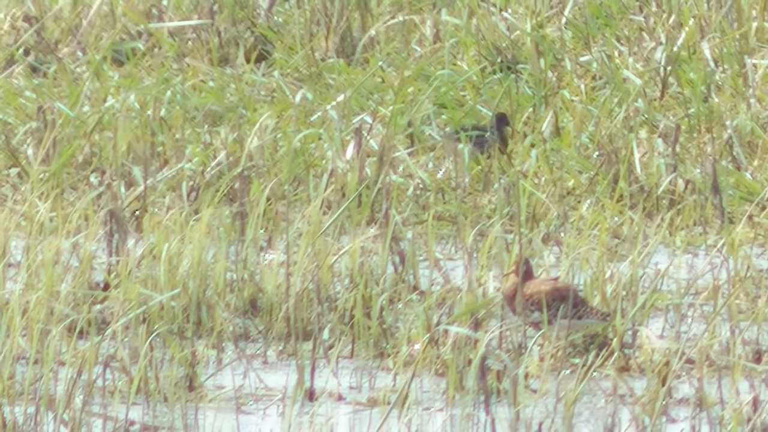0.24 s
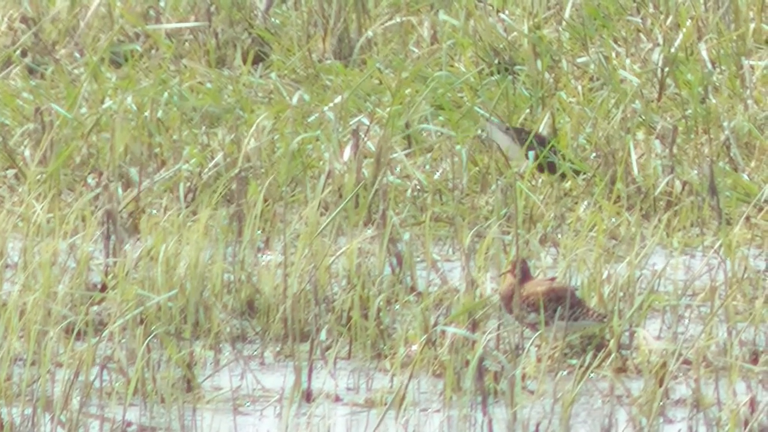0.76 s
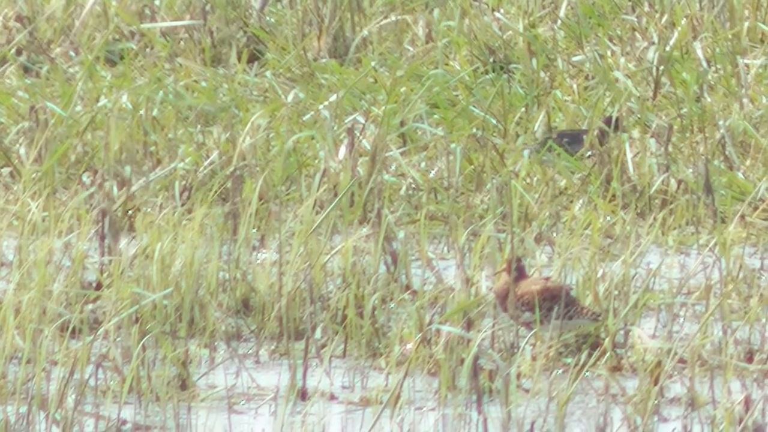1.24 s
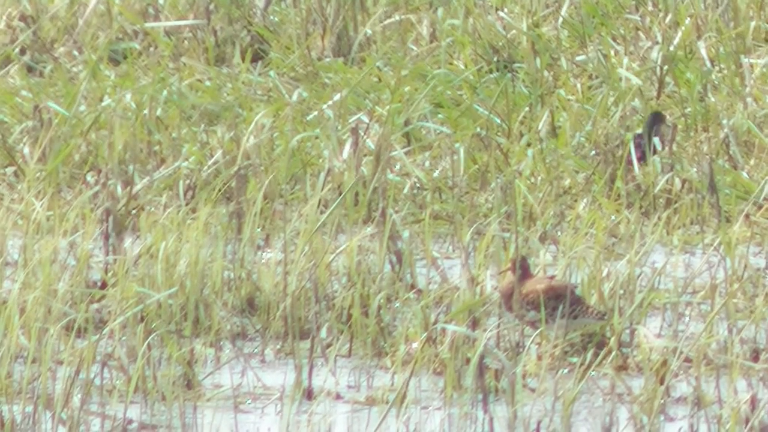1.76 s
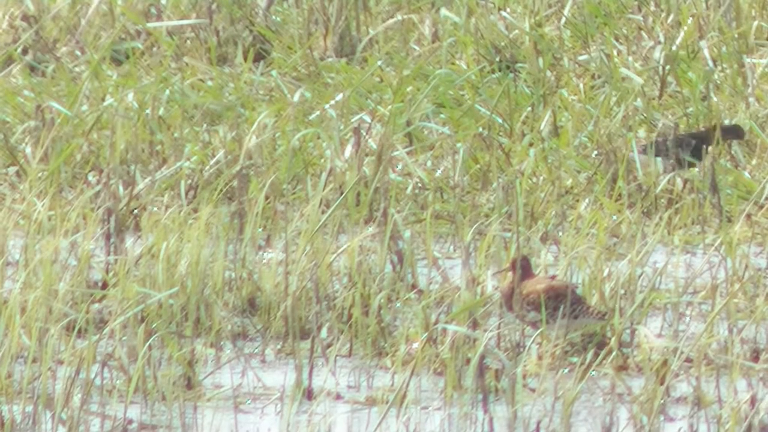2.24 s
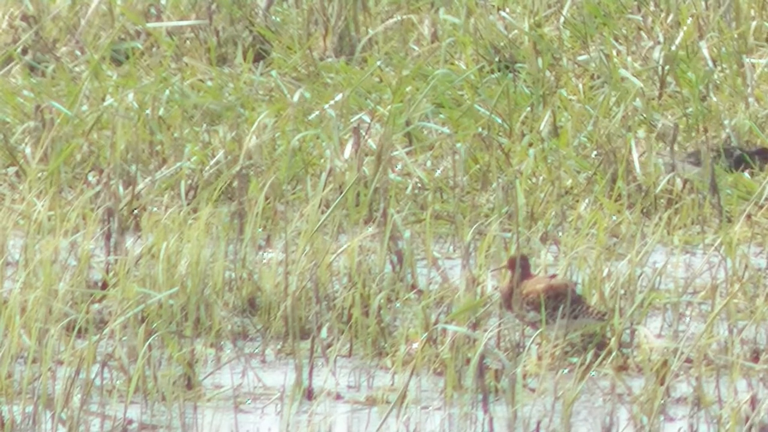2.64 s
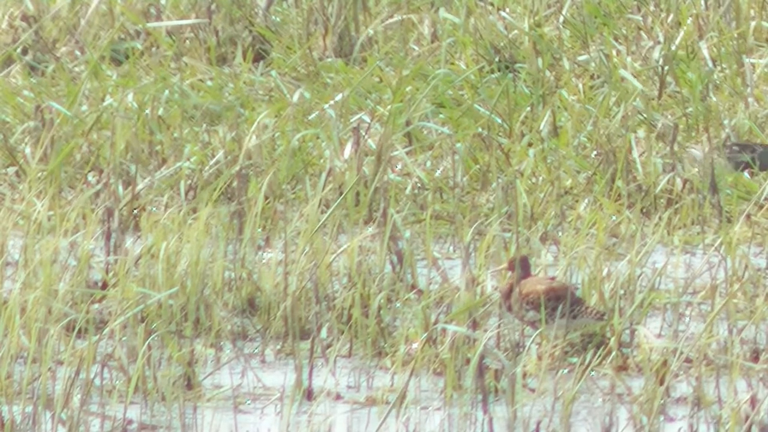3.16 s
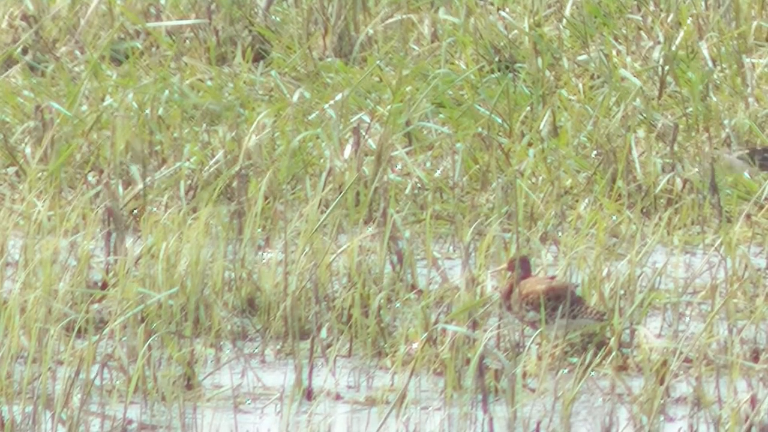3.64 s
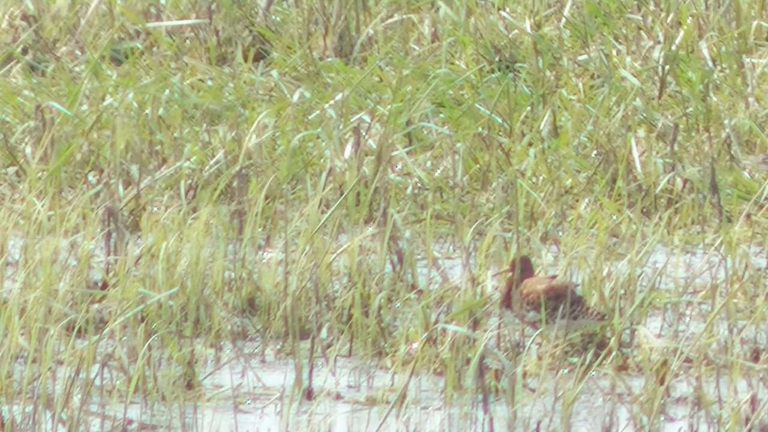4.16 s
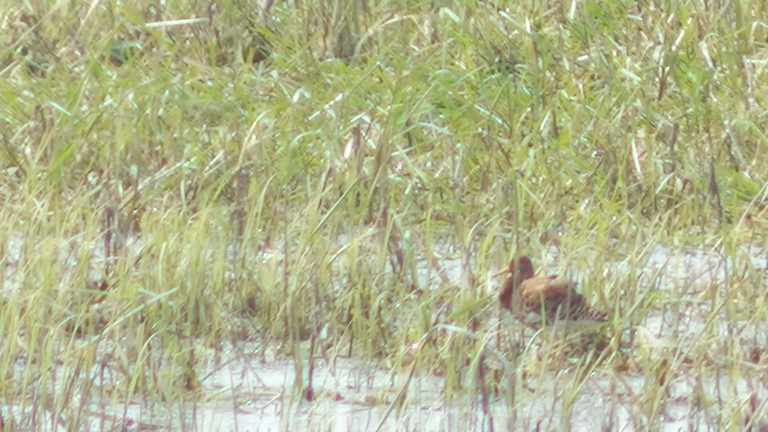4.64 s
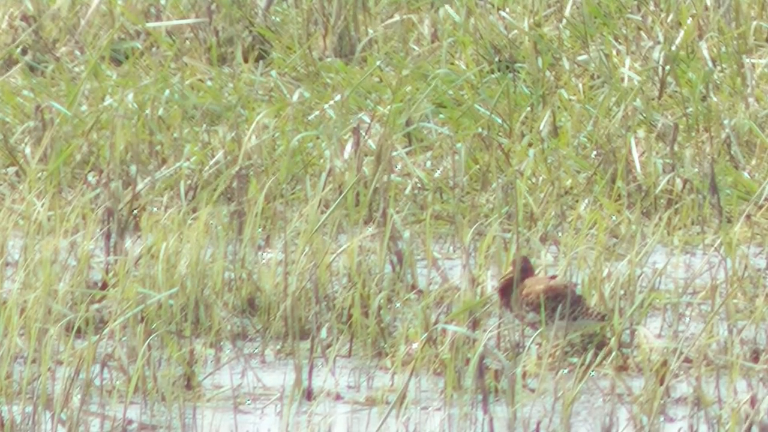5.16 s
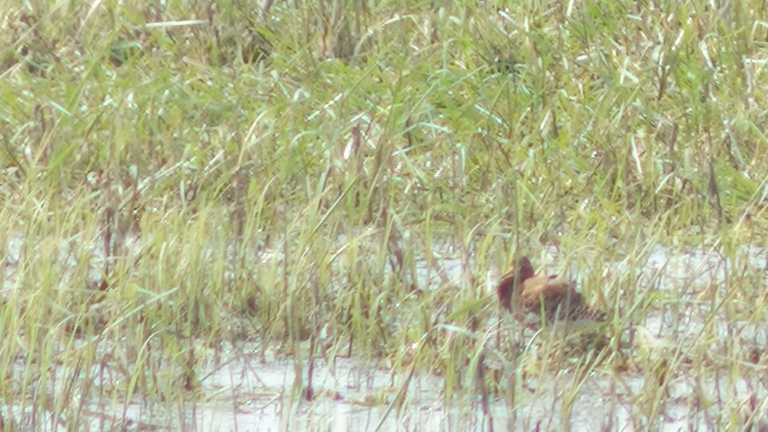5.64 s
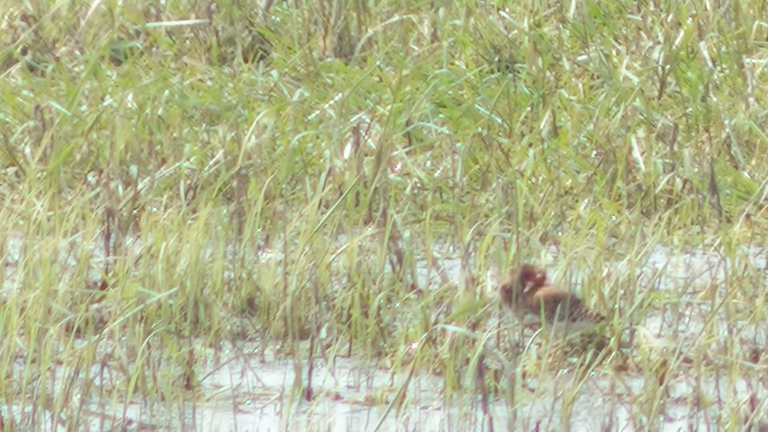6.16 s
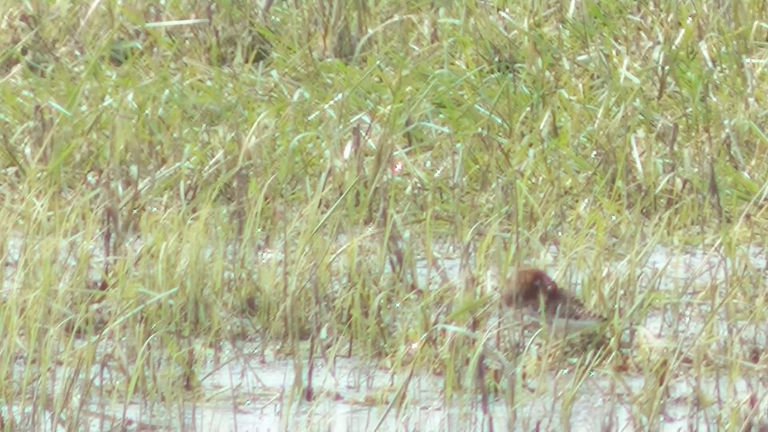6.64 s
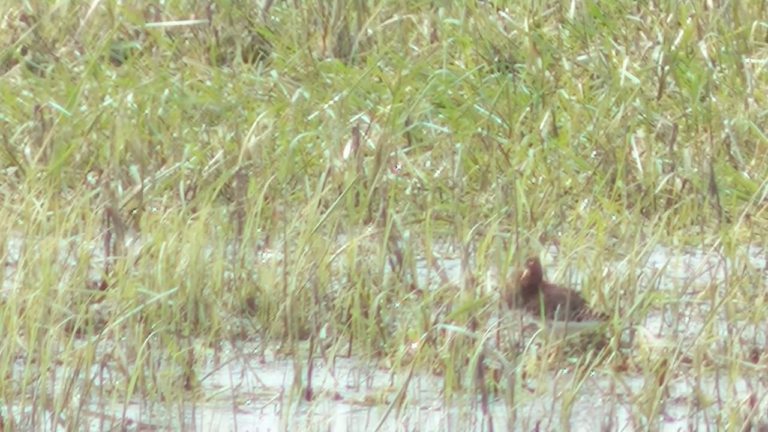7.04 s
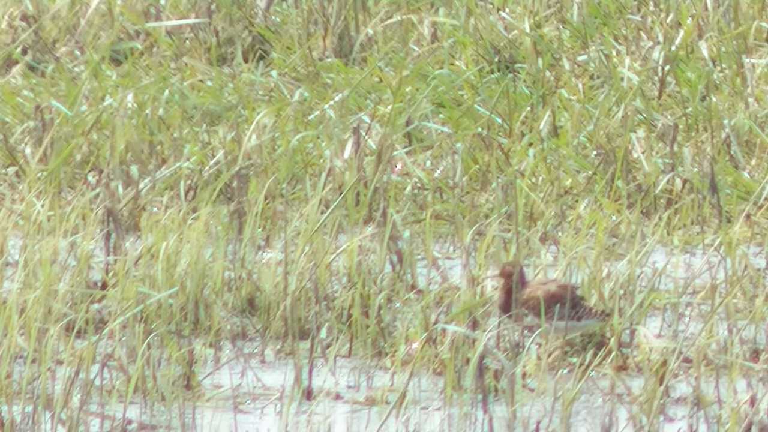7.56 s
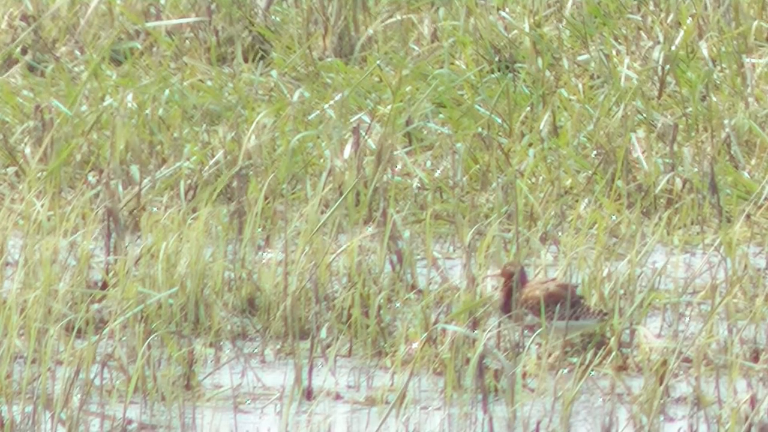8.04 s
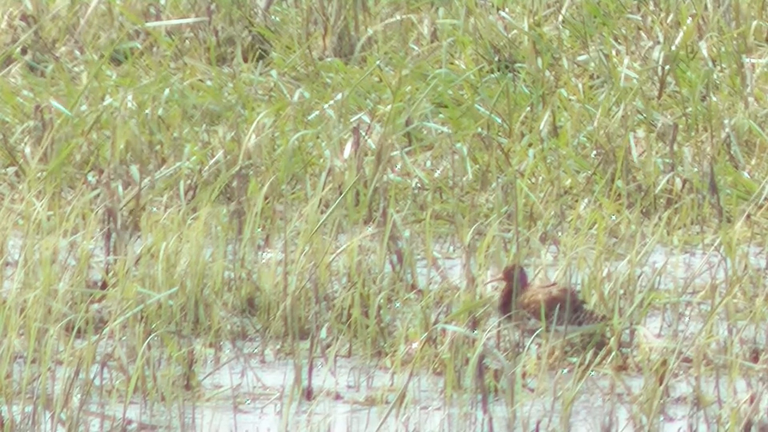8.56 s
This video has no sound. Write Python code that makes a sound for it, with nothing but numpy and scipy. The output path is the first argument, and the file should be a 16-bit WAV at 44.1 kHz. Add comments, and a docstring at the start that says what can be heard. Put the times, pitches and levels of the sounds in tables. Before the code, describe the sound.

An open marsh full of birds, picked up by a camera microphone with light hiss, a faint thin high tone and a weak far hum. From 0 to 2.5 seconds harsh chattering chips overlap with slurred whistles, a bright pip trill near 1 second and a busy cluster around 1.3, with brief reed rustles at 0.4 and 1.6. A long whistle dips and holds at 2.6 and again at 4.3. A dry ticking trill comes at 3.3 and 5.0, each followed by a set phrase of falling steps, buzz and seesaw notes, at 3.5 and 5.2. A stem snaps at 3.8. Low wind buffets grow from 4.8, thumping hardest around 5.5 to 5.8 and again near 7.1. From 6.3 to 7.85 a near bird warbles quickly and loudly. Afterwards only faint twitters, small wind puffs and distant chorus remain until 8.8.

```python
"""A near songbird warbles a quick phrase of arches, hooks and downstrokes; another gives two long dipping
whistles. Farther out, birds slur, chatter, trill and sing a set phrase: gliding sines, roughened by phase
flutter when harsh. The farthest blur into a flickering band of noise, and the marsh smears the calls with a
noise tail. Puffs of wind buffet the microphone ports as shaped noise; reeds rustle, a moorhen splashes and
stems snap as bursts of noise. Under it lie open air, a far hum and a sinking whine, and the camera's hiss and
thin tone."""
import sys
import numpy as np
from scipy import signal
from scipy.fft import rfft, irfft, next_fast_len
from scipy.io import wavfile
from scipy.ndimage import uniform_filter1d, map_coordinates

SR = 44100
rng = np.random.default_rng(int(sys.argv[2]) if len(sys.argv) > 2 else 0)


def dump_mix(stems):
    """Bounce the given channels to the path in sys.argv[1] as a 16-bit WAV at rate SR."""
    frames = np.atleast_2d(stems).T  # one column per channel
    limited = np.clip(frames, -1, 1)  # hard clip at full scale
    pcm = np.round(limited * 32767).astype(np.int16)
    wavfile.write(sys.argv[1], SR, pcm)


N = 387638  # length in samples

# how busy the distant birds are, before each layer's own trim: [t/s, level/dB]
CHORUS_LEVELS = [(0.0, -52.5), (1.25, -52), (1.39, -49), (3.82, -54), (4.28, -52), (4.87, -56.5),
                 (7.69, -52.5), (8.17, -55), (8.79, -54.5)]


def amp(db):
    """Decibels to gain."""
    return 10 ** (np.asarray(db) / 20)


def unit(x):
    """Scale to rms 1."""
    return x / np.sqrt(np.mean(x ** 2) + 1e-20)


def curves(rows):
    """One value per sample for each column after the time."""
    times, *columns = np.transpose(rows)
    return [np.interp(np.arange(N) / SR, times, column) for column in columns]


def arch(values, count):
    """A parabola through a start, a middle and an end value."""
    first, middle, last = values
    u = np.linspace(-1, 1, count)
    return middle + u * (last - first) / 2 + u * u * ((first + last) / 2 - middle)


def around(before_s, after_s):
    """Sample times on both sides of a moment."""
    return np.arange(-max(round(before_s * SR), 2), max(round(after_s * SR), 2)) / SR


def bell(t, width):
    """A smooth hump of height 1 at t = 0, down to 1/e at one width."""
    return np.exp(-(t / width) ** 2)


def wobble(rate, count=N):
    """A smooth random curve, rate knots a second."""
    knots = rng.standard_normal(int(count * rate / SR) + 4)
    return map_coordinates(knots, [np.arange(count) * rate / SR])


def add(track, s, wave):
    """Mix a wave into the track from time s on."""
    start = max(round(s * SR), 0)
    room = track[start:start + len(wave)]
    room += wave[:len(room)]


def tone(hz):
    """A sine that follows a pitch curve."""
    return np.sin(2 * np.pi * np.cumsum(hz) / SR)


def filtered(x, response):
    """Multiply the spectrum of x by a response of frequency."""
    padded = next_fast_len(N + SR // 2)
    spectrum = rfft(x, padded) * response(np.fft.rfftfreq(padded, 1 / SR))
    return irfft(spectrum, padded)[..., :N]


def coloured(x, spectrum):
    """White x shaped by [f/Hz, level/dB] points, at rms 1."""
    f, db = np.transpose(spectrum)
    return unit(filtered(x, lambda hz: amp(np.interp(np.log(hz + 1), np.log(f), db))))


def syrinx(hz, gain, fade_s, waver, flutter_db):
    """One unbroken, nearly pure whistle follows a pitch and a gain, both slightly unsteady."""
    count = len(hz)
    soft = signal.windows.tukey(count, min(2 * fade_s * SR / count, 1))
    phase = 2 * np.pi * np.cumsum(hz * (1 + waver * wobble(355, count))) / SR
    whistle = np.sin(phase) + amp(-58) * np.sin(2 * phase)
    return gain * soft * amp(flutter_db * wobble(212, count)) * whistle


def warbler_voice(hz, gain):
    """The near bird's whistle, with a little waver in its pitch."""
    return syrinx(hz, gain, fade_s=.002, waver=.012, flutter_db=.9)


def arches(rest_hz):
    """Soft notes rise from the resting pitch to a top and sink back as they swell and fade."""
    track = np.zeros(N)
    # soft arched notes: [t of top/s, half length/s, top f/Hz, level/dB]
    arch_notes = [(6.309, .018, 2560, -45), (6.361, 0.027, 2440, -45.5), (6.411, 0.037, 2490, -34.5),
                  (6.495, 0.023, 2630, -41), (6.542, 0.026, 2640, -34.5), (6.592, 0.02, 2540, -36.5),
                  (6.774, 0.019, 2580, -38), (6.823, 0.023, 2650, -32.5), (6.869, 0.019, 2540, -35),
                  (7.055, 0.017, 2740, -35.5), (7.147, .024, 2570, -33.5), (7.343, .016, 3400, -32.5),
                  (7.434, 0.018, 3220, -29), (7.625, 0.016, 3394, -31.5), (7.722, 0.02, 3320, -27)]
    for s, half, top, db in arch_notes:
        t = around(half, half)
        pitch = rest_hz + (top - rest_hz) * bell(t, 0.8 * half)
        add(track, s - half, warbler_voice(pitch, amp(db) * bell(t, 0.93 * half)))
    return track


def hooks(rest_hz, drop_s=0.005, step_hz=150, sag_s=0.0105, tail_fade_db_per_s=178):
    """Accents rise to a loud peak, then snap down a step into a quieter, sagging tail."""
    track = np.zeros(N)
    # accents: [t of peak/s, rise/s, tail/s, top f/Hz, end f/Hz, peak level/dB, tail level/dB]
    hook_notes = [(6.641, 0.0083, 0.066, 2730, 2170, -25.5, -31),
                  (6.924, 0.015, 0.057, 2864, 2105, -21.5, -30.5),
                  (7.21, 0.019, 0.056, 2860, 2090, -19.5, -29.5),
                  (7.496, 0.017, .061, 2833, 2047, -21, -30), (7.785, 0.026, .064, 2900, 2320, -22, -23)]
    for s, rise, tail, top, end, peak_db, tail_db in hook_notes:
        t = around(rise, tail)
        after = np.maximum(t, 0)
        dropped = (1 + np.tanh((t - drop_s) / 0.0017)) / 2  # 0 on the peak, 1 in the tail
        sunk = 1 - 1 / np.sqrt(1 + (after / sag_s) ** 2)
        climb = (top - rest_hz) * bell(t - after, rise)
        sag = (top - step_hz - end) * sunk / sunk[-1]
        peak_gain = (1 - dropped) * amp(peak_db) * bell(t, 0.56 * rise)
        tail_gain = dropped * amp(tail_db - tail_fade_db_per_s * after)
        add(track, s - rise, warbler_voice(rest_hz + climb - step_hz * dropped - sag, peak_gain + tail_gain))
    return track


def downstrokes(swing_hz=940, lead_in_s=0.047, soft_db=-43):
    """Sharp falling notes follow a soft level lead-in, whose gain also stays under the fall."""
    track = np.zeros(N)
    # downstrokes: [t of loudest/s, half length/s, f/Hz, level/dB, lead-in f/Hz]
    stroke_notes = [(7.112, .011, 2965, -22, 2650), (7.396, 0.015, 3005, -22, 2610),
                    (7.682, .02, 3030, -20, 3330)]
    for s, half, hz, db, lead_hz in stroke_notes:
        t = around(half + lead_in_s, 1.33 * half)
        falling = t > -half
        # swing_hz is half the fall
        pitch = np.where(falling, hz - swing_hz * np.tanh(t / (0.926 * half)), lead_hz)
        gain = np.where(falling, amp(db) * bell(t, 0.61 * half), 0) + amp(soft_db)
        add(track, s - half - lead_in_s, warbler_voice(pitch, gain))
    return track


def warbler():
    """The near bird strings together whistled arches, hooks and downstrokes."""
    rest_hz = 2090  # arches and hooks climb from here
    return arches(rest_hz) + hooks(rest_hz) + downstrokes()


def whistler(dip_hz=2490, dip_db=-7.5, lead_s=0.044, swell_s=0.038, fade_db_per_s=12):
    """Each long whistle dips softly, climbs back and swells on its held pitch, then slowly fades."""
    track = np.zeros(N)
    # long whistles: [t of dip/s, hold/s, held f/Hz, dip width/s, level/dB]
    whistles = [(2.576, 0.25, 3655, 0.021, -34.5), (4.276, 0.247, 3612, .03, -35.5)]
    for s, hold, hz, width, db in whistles:
        t = around(lead_s, hold)
        pitch = hz - (hz - dip_hz) / (1 + (t / width) ** 2)
        softness = (1 - np.tanh((t - swell_s) / 0.003)) / 2
        level = db + dip_db * softness - fade_db_per_s * (t - swell_s)
        add(track, s - lead_s, syrinx(pitch, amp(level), fade_s=.012, waver=0.0015, flutter_db=0.55))
    return track


def slur(length, first_hz, last_hz, db, waver=0.0096, bow=.1, edge_db=-6):
    """One whistled glide bows under its straight line by a share of its span, with softer ends."""
    count = max(round(length * SR), 8)
    middle_hz = (first_hz + last_hz) / 2 - bow * abs(last_hz - first_hz)
    pitch = arch((first_hz, middle_hz, last_hz), count)
    level = db + arch((edge_db, 0, edge_db), count)
    return syrinx(pitch, amp(level), fade_s=0.0024, waver=waver, flutter_db=2.4)


def slurs():
    """Overlapping single glides from birds farther out."""
    track = np.zeros(N)
    # glides: [t/s, length/s, first f/Hz, last f/Hz, level/dB]
    glides = [(0.266, 0.17, 5200, 3690, -47), (.449, 0.14, 3530, 2880, -47.5),
              (1.124, 0.16, 6550, 5280, -47), (1.217, .048, 3330, 4000, -44.5),
              (1.262, 0.014, 4800, 3470, -38.5), (1.292, 0.053, 3670, 4960, -42),
              (1.322, .047, 3600, 2600, -40.5), (1.339, .032, 5640, 5700, -49),
              (1.342, .04, 4270, 4170, -44), (1.386, 0.015, 5300, 5360, -43),
              (1.403, 0.0092, 5120, 3440, -36.5), (1.42, 0.027, 5340, 3400, -37.5),
              (1.455, 0.041, 2520, 2700, -48), (1.555, 0.033, 3084, 2510, -51),
              (1.581, 0.032, 2500, 3100, -44), (1.668, 0.023, 3000, 2250, -45),
              (1.694, .022, 2280, 3040, -41), (1.741, .009, 3500, 2450, -42),
              (2.042, 0.033, 1970, 2500, -49.5), (2.086, 0.023, 3600, 3410, -44.5),
              (2.274, 0.031, 4420, 2700, -42), (3.149, 0.031, 3710, 5740, -49),
              (3.207, 0.042, 6180, 4440, -48), (3.292, 0.29, 2294, 2284, -59),
              (3.4, 0.038, 2250, 2230, -52.5), (3.599, 0.37, 1870, 1930, -57),
              (4.13, .017, 3510, 5170, -51), (4.253, 0.0148, 3700, 5100, -49),
              (4.357, 0.014, 4100, 4900, -50), (4.871, 0.02, 3050, 4700, -48),
              (4.932, 0.037, 5830, 4370, -54), (5.201, 0.026, 5700, 5400, -50),
              (7.921, .01, 4560, 4260, -46)]
    for s, *note in glides:
        add(track, s, slur(*note))
    return track


def trill(start, end, chips, pitch, level, sweep_hz, length, rasp, ends_db=-1.5):
    """A run of swept chips from a first to a last pitch and level; uneven membrane flutter makes the rasp."""
    rasp_hz, scatter_db = 850, 0.5
    depth, grit = 1.0, 1.1  # regular and random phase flutter at rasp 1 (radians)
    track = np.zeros(N)
    chips, count = max(int(round(chips)), 1), int(length * SR)
    u = np.linspace(-.5, .5, count)
    times, pitches = np.linspace(start, end, chips), np.linspace(*pitch, chips)
    levels = np.linspace(*level, chips) + arch((ends_db, 0, ends_db), chips)
    for s, hz, db, luck in zip(times, pitches, levels, rng.standard_normal((chips, 4))):
        glide = hz * (1 + 0.01 * luck[0]) + sweep_hz * u - 700 * (u * u - np.mean(u * u))
        flutter_turns = rasp_hz * (1 + 0.095 * luck[1]) * u * length + luck[2]
        flutter = 2 * np.pi * flutter_turns + wobble(404, count)
        roughness = rasp * (depth * np.sin(flutter) + grit * wobble(1407, count))
        phase = 2 * np.pi * np.cumsum(glide) / SR + roughness
        swell = np.hanning(count) * (1 + .5 * rasp * np.cos(flutter))
        add(track, s - length / 2, amp(db + scatter_db * luck[3]) * swell * np.sin(phase))
    return track


def chatter(trim_db=-1.8, beak_hz=5500):
    """Harsh rasps, falling ticks, level pips and running twitters of swept chips, dulled above the beak's limit."""
    # levels in these four tables stand before the trim
    # harsh, noisy chips: [first t/s, last t/s, chips, f/Hz, level/dB]
    rasps = [(.005, 0.018, 2.15, 3800, -38.5), (0.127, .196, 4.2, 3850, -38),
             (0.293, 0.367, 4.5, 3800, -37), (.48, .507, 2.1, 3750, -40), (0.614, 0.681, 3.9, 3900, -38.5),
             (0.772, 0.894, 8.5, 3950, -36.5), (1.008, 1.027, 2, 3800, -36),
             (1.121, 1.158, 3.2, 3800, -39.5), (1.452, 1.485, 3, 3710, -36), (1.563, 1.694, 8, 3800, -40.5),
             (1.772, 1.793, 1.9, 4150, -41), (1.876, 1.906, 4.3, 3600, -36.5), (1.954, 2.1, 8, 3596, -46.5),
             (2.268, 2.289, 3, 3900, -40.5), (2.725, 2.835, 5.2, 5100, -47.5), (2.827, 3.01, 8, 3900, -48),
             (2.89, 3.014, 5.7, 4800, -48.5), (4.595, 4.62, 4.2, 4200, -39),
             (8.108, 8.183, 5.7, 4200, -49.5), (8.412, 8.525, 7.2, 3400, -51.5),
             (8.579, 8.631, 5.3, 3800, -48.5)]
    # steeply falling ticks: [first t/s, last t/s, chips, middle f/Hz, level/dB]
    ticks = [(2.126, 2.227, 7, 3790, -40), (3.284, 3.425, 7, 3530, -34.5), (5.009, 5.148, 7, 3530, -34.5),
             (6.022, 6.048, 3, 3850, -35.5), (6.586, 6.604, 3, 4080, -41), (6.861, 6.903, 4, 3890, -42.5)]
    # trills of short pips: [first t/s, last t/s, chips, f/Hz, level/dB, rasp 0-1]
    pips = [(.038, 0.111, 5, 3400, -41.5, 0), (.917, 1.013, 8, 3550, -31.5, 0.06),
            (1.457, 1.487, 3, 3490, -30, 0.38), (1.942, 2.073, 11, 2900, -40, 0.52),
            (2.343, 2.475, 9, 2934, -40, 0.42), (2.643, 2.718, 5, 3010, -40, 0.24),
            (6.618, 6.663, 5, 3040, -38, 0.23), (6.711, 6.741, 4, 2930, -38, 0.26),
            (6.778, 6.807, 4, 3080, -42, 0.2), (7.459, 7.473, 2, 3000, -31.5, 0),
            (7.586, 7.601, 2, 3050, -32, 0)]
    # twitters: [first t/s, last t/s, chips, first f/Hz, last f/Hz, first level/dB, last level/dB]
    twitters = [(1.538, 1.769, 15, 4550, 4680, -33.5, -46.5), (3.017, 3.104, 7, 4250, 2800, -41, -31.5),
                (3.125, 3.163, 3, 3500, 3000, -37.5, -39), (4.691, 4.81, 9, 4720, 2830, -42.5, -36),
                (6.06, 6.085, 4, 3360, 2680, -31, -34), (6.093, 6.116, 4, 2920, 4180, -32.5, -37.5),
                (6.17, 6.279, 8, 4200, 2340, -38.5, -40.5), (6.949, 6.972, 3, 3100, 4430, -28.5, -42),
                (7.022, 7.086, 6, 4180, 2820, -38.5, -35), (7.751, 7.835, 6, 4900, 3770, -48.5, -40.5),
                (7.874, 7.929, 6, 4060, 2840, -48, -39.5), (8.001, 8.042, 4, 4350, 3220, -40, -47.5),
                (8.191, 8.229, 4, 4360, 3120, -43.5, -38.5), (8.655, 8.697, 5, 3580, 2780, -47, -42.5)]
    track = np.zeros(N)
    for s, end, chips, hz, db in rasps:
        length = .9 * (end - s) / (chips - 1)
        track += trill(s, end, chips, (hz, hz), (db, db), sweep_hz=-1170, length=length, rasp=0.72)
    for s, end, chips, hz, db in ticks:
        pitch = (1.05 * hz, 0.95 * hz)
        track += trill(s, end, chips, pitch, (db, db), sweep_hz=-2300, length=.0078, rasp=0.049)
    for s, end, chips, hz, db, rasp in pips:
        track += trill(s, end, chips, (hz, hz), (db, db), sweep_hz=-300, length=.012, rasp=rasp)
    for s, end, chips, first_hz, last_hz, first_db, last_db in twitters:
        pitch, level = (first_hz, last_hz), (first_db, last_db)
        track += trill(s, end, chips, pitch, level, sweep_hz=-550, length=.0098, rasp=0.14)
    return filtered(amp(trim_db) * track, lambda hz: 1 / np.sqrt(1 + (hz / beak_hz) ** 20))


def songster(low_note_lag_s=.016):
    """Glides and chips form a flick, four falling steps, a buzz ending in a fall, and a high-low seesaw."""
    track = np.zeros(N)
    # set phrases: [t/s, t of seesaw/s, t of its last high note/s, pairs in it, level/dB]
    phrases = [(3.504, 3.907, 4.147, 8, -41), (5.235, 5.649, 5.923, 9, -37.5)]
    for s, first, last, pairs, db in phrases:
        flick = slur(0.0165, 4630, 3890, db - 3.5)
        add(track, s - .007, flick)
        steps = trill(s + .015, s + .074, 4, (3320, 2350), (db + 1, db - 5),
                      sweep_hz=-200, length=.027, rasp=0.057)
        buzz = trill(s + .153, s + .287, 12, (4280, 4500), (db - 4.5, db - 10.5),
                     sweep_hz=710, length=.015, rasp=.14, ends_db=0.0)
        fall = slur(0.059, 4450, 3460, db)
        add(track, s + .283, fall)
        high = trill(first, last, pairs, (2880, 2720), (db, db - 4.0),
                     sweep_hz=0, length=.014, rasp=0.22, ends_db=0.8)
        low = trill(first + low_note_lag_s, last + low_note_lag_s, pairs, (2500, 2400), (db, db),
                    sweep_hz=-460, length=.02, rasp=0.17)
        track += steps + buzz + high + low
    return track


def distant_calls(count=150):
    """Faint stray glides from across the marsh, clear or hoarse, follow the level of the chorus."""
    track = np.zeros(N)
    times, levels = np.transpose(CHORUS_LEVELS)
    for when, pitch, slope, span, faintness, hoarse in rng.random((count, 6)):
        s, hz = when * N / SR, 2300 + 2500 * pitch
        last_hz = hz + 700 * (slope - .7)
        db = np.interp(s, times, levels) - 4.5 - 8 * faintness
        add(track, s, slur(0.0144 + 0.0407 * span, hz, last_hz, db, waver=0.0806 * hoarse))
    return track


def far_chorus(patchy_db=4):
    """Countless distant birds blur into a noise band that flickers in patches of time and pitch."""
    # colour of the blurred birds: [f/Hz, level/dB]
    bird_colour = [(1200, -51), (2000, -4.5), (2900, 1.5), (4200, -3), (5200, -8.5), (6500, -11),
                   (10000, -56)]
    cells = signal.stft(rng.standard_normal(N), nperseg=512)[2]
    patches = uniform_filter1d(rng.standard_normal(cells.shape), size=4, axis=0)
    patches = uniform_filter1d(patches, size=7, axis=1)
    twitter = signal.istft(cells * amp(patchy_db * unit(patches)), nperseg=512)[1][:N]
    return amp(curves(CHORUS_LEVELS)[0] - 5.0) * coloured(twitter, bird_colour)


def marsh(x, early_t60=0.079, late_t60=0.93, late_db=-6):
    """Nearby stems and water smear each call at once; the far reed beds add a faint decaying tail."""
    t = np.arange(SR // 2) / SR

    def scatter(t60):
        """Decaying noise with a soft onset."""
        return unit(rng.standard_normal(len(t)) * amp(-60 * t / t60) * (1 - np.exp(-t / 0.0026)))

    tail = (scatter(early_t60) + amp(late_db) * scatter(late_t60)) / np.sqrt(len(t))
    return signal.fftconvolve(x, tail)[:N]


def wind(calm_db=-77.5, flutter_db=2):
    """Turbulence buffets each port with its own noise; hard puffs are brighter and shed single eddies."""
    # puffs on the ports: [t of strongest/s, half width/s, level/dB before flutter]
    puffs = [(.07, .06, -65), (.48, 0.18, -62), (1.13, 0.1, -58.5), (1.165, 0.0092, -48),
             (1.29, 0.019, -55), (1.63, 0.048, -64), (3.65, 0.28, -68.5), (4.38, 0.047, -60.5),
             (4.76, 0.023, -50.5), (4.88, 0.066, -52), (5.46, 0.095, -54.5), (5.57, .035, -44.5),
             (5.77, 0.1, -43.5), (6.05, 0.16, -51), (6.57, 0.095, -51), (6.79, 0.084, -48),
             (7.1, 0.089, -42), (7.29, 0.16, -45.5), (7.655, 0.015, -46.5), (7.82, 0.092, -56),
             (8.031, 0.035, -54), (8.248, 0.011, -46), (8.389, 0.028, -50), (8.6, 0.093, -57)]
    # single eddies on the ports: [t/s, level/dB before an 8 dB cut]
    thumps = [(4.869, -40), (5.464, -32), (5.49, -30), (5.569, -29.5), (5.758, -25.5), (5.842, -32),
              (7.339, -30.5)]
    # colours of the steady buffeting and of the eddies: [f/Hz, level/dB]
    buffet_colour = [(25, -30), (80, -32), (120, -11), (170, -2.5), (250, 0), (400, -3.5), (600, -11.5),
                     (1000, -30.5), (2000, -48), (4000, -80)]
    eddy_colour = [(80, -42), (130, -20), (210, 4), (400, 3), (800, -2.5), (1300, -14), (1700, -38),
                   (5000, -67)]
    clock = np.arange(N) / SR
    puff_power = sum(amp(db) ** 2 * bell(clock - s, width) for s, width, db in puffs)
    power = amp(calm_db) ** 2 + puff_power
    level_db = 10 * np.log10(power) + flutter_db * wobble(28)
    lumps = amp(2 * np.array([wobble(60), wobble(60)]))
    buffeting = unit(lumps * coloured(rng.standard_normal((2, N)), buffet_colour))
    rumble = amp(level_db + 0.03) * buffeting
    eddies = amp(-62.5 + 1.39 * (level_db + 51.5))  # grows faster than the rumble
    t = np.arange(SR // 10) / SR
    for s, db in thumps:
        add(eddies, s, amp(db - 8.0 - 60 * t / 0.064) * (1 - np.exp(-t / 0.0005)))
    eddy_noise = coloured(eddies * rng.standard_normal((2, N)), eddy_colour)
    return rumble + np.sqrt(np.mean(eddies ** 2)) * eddy_noise


def reeds():
    """Brushed leaves crackle and a moorhen splashes as lumpy noise; dry stems snap as fast-decaying noise."""
    # rustles, and a moorhen's splashes at 1.55-1.67 s: [start t/s, end t/s, level/dB]
    rustles = [(0.0, 0.1, -54), (0.397, 0.487, -44), (1.55, 1.577, -47), (1.588, 1.669, -51),
               (2.324, 2.42, -64), (6.232, 6.36, -56.5)]
    # dry stems: [t/s, level/dB before a 2.5 dB cut]
    snaps = [(3.474, -49), (3.7915, -30.5), (3.795, -45), (6.673, -32.5)]
    # colours of the leaves and splashes and of the stems: [f/Hz, level/dB]
    leaf_colour = [(100, -16), (300, 4.5), (900, -2), (1900, 4.5), (4000, 0.5), (7500, -6.5), (12000, -19),
                   (16000, -32)]
    stem_colour = [(200, -19), (900, -10), (2000, 2), (3800, 1.5), (6000, -11), (12000, -25)]
    brush, snap = np.zeros(N), np.zeros(N)
    t = np.arange(SR // 20) / SR
    for start, end, db in rustles:
        add(brush, start, amp(db) * signal.windows.tukey(max(int((end - start) * SR), 2), .5))
    for s, db in snaps:
        add(snap, s, amp(db - 2.5 - 60 * t / 0.022) * (1 - np.exp(-t / 0.00012)))
    crackle = rng.standard_normal(N) * amp(2.8 * wobble(500))
    return brush * coloured(crackle, leaf_colour) + snap * coloured(rng.standard_normal(N), stem_colour)


def far_tones():
    """A wavering hum and a sinking whine from far off, each an unsteady sine."""
    # far whine: [t/s, f/Hz, level/dB]
    drone_path = [(3.9, 1363, -70), (4.8, 1365, -73), (5.5, 1345, -66.5), (6.0, 1292, -65.5),
                  (6.6, 1205, -80)]
    # far hum: [t/s, level/dB]
    hum_levels = [(0, -70.5), (1.5, -72), (3.1, -71.5), (3.4, -85), (4.1, -66.5), (5, -80), (8.79, -70)]
    drone_hz, drone_db = curves(drone_path)
    t = np.arange(N) / SR
    sounding = (t > drone_path[0][0]) * (t < drone_path[-1][0])
    drone = amp(drone_db + 0.91 * wobble(12)) * tone(drone_hz + 6 * wobble(30)) * sounding
    hum = amp(curves(hum_levels)[0] + 2.6 * wobble(7)) * tone(505 + 30 * wobble(80))
    return drone + hum


def background():
    """Open air and camera hiss as shaped noise, the far tones, and the camera's thin tone as a sine."""
    # colour of open air and hiss: [f/Hz, level/dB]
    air_colour = [(18, -56), (30, -22), (177, -15.5), (315, -6.5), (410, -5.5), (505, -2.5), (728, -2.5),
                  (1720, -1), (3400, -8.5), (5890, -8.5), (7460, -7), (8060, -7), (8720, -8.5),
                  (15500, -14.5)]
    port_colour = [(40, -18), (200, -5), (500, 0), (1200, -7.5), (3000, -16.5), (6000, -56.0)]
    air = amp(-57.5) * coloured(rng.standard_normal(N), air_colour)
    ports = amp(-65.0) * coloured(rng.standard_normal(N), port_colour)
    whine = amp(-67 + wobble(23)) * tone(7812 + 12 * wobble(70))
    opposite = np.array([[1], [-1]])  # the port noise has opposite signs left and right
    return air + far_tones() + whine + ports * opposite


def scene():
    """The birds sit in the middle; only the wind and the port noise are wide."""
    near = warbler() + whistler()
    far = slurs() + chatter() + songster()
    stray = distant_calls()
    echo = marsh(amp(-17) * near + amp(-11) * far + amp(-5) * stray)  # more echo with distance
    return near + far + stray + echo + far_chorus() + wind() + reeds() + background()


def record(dry, top_hz=15740):
    """The camera keeps nothing above its band limit."""
    return filtered(dry, lambda hz: hz < top_hz)


dry = scene()
out = record(dry)
dump_mix(out)
```